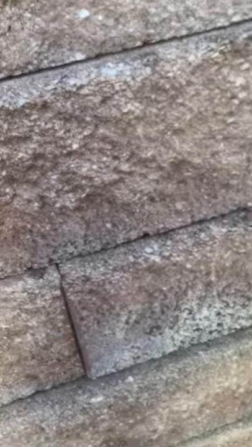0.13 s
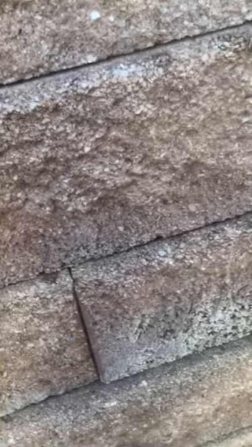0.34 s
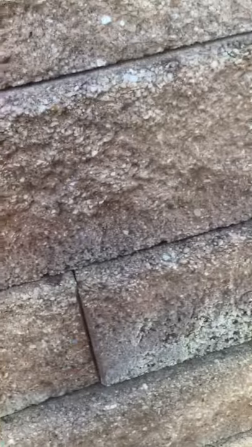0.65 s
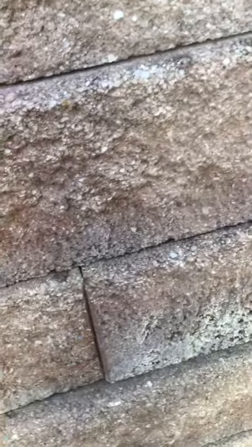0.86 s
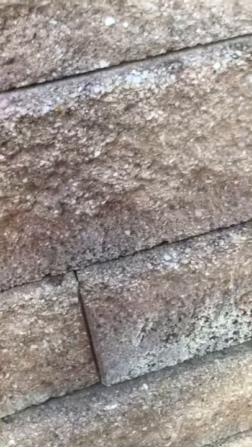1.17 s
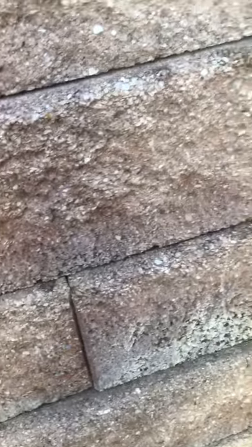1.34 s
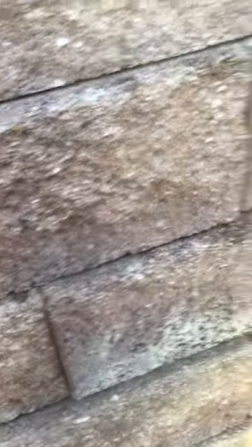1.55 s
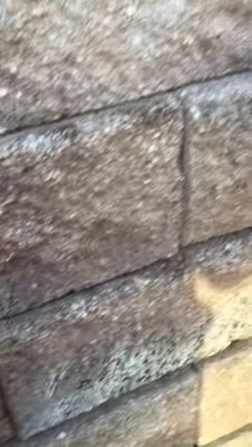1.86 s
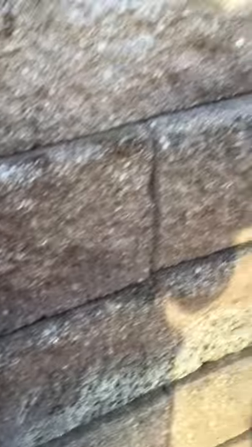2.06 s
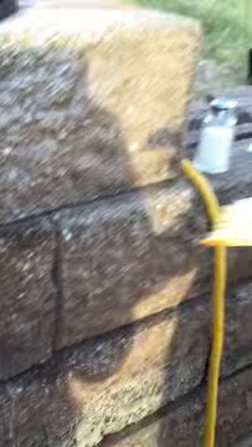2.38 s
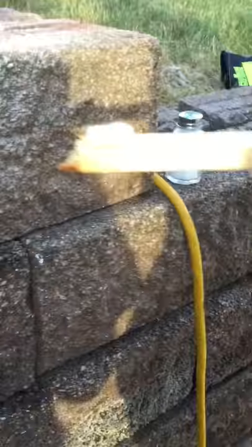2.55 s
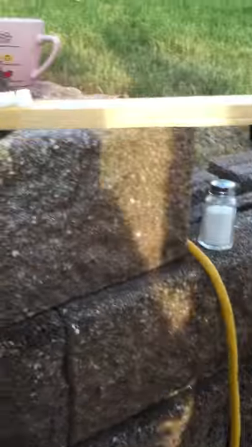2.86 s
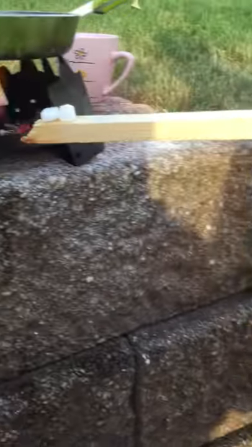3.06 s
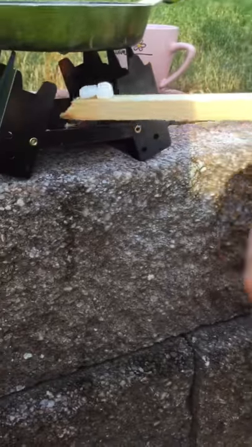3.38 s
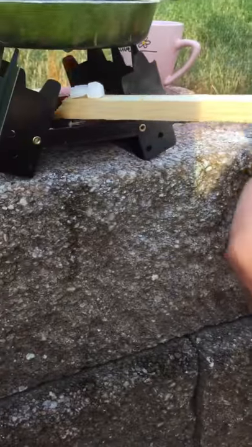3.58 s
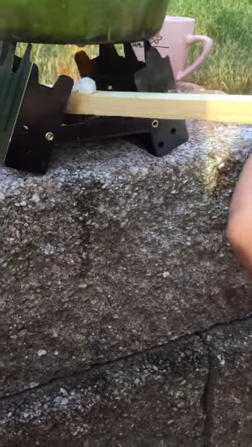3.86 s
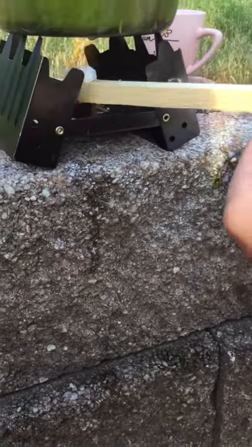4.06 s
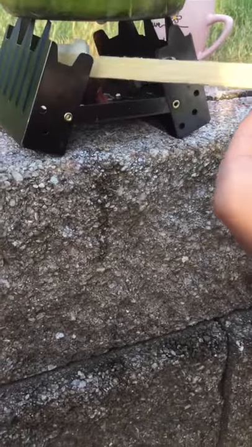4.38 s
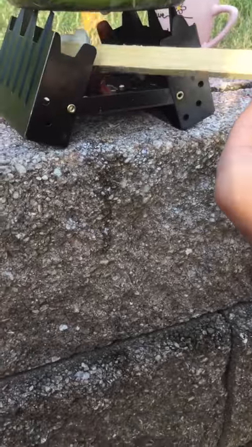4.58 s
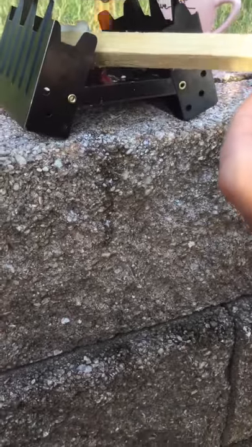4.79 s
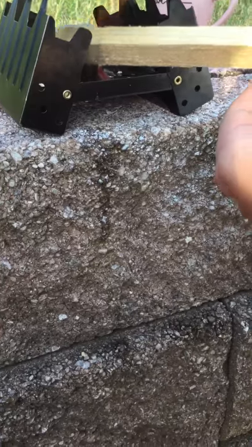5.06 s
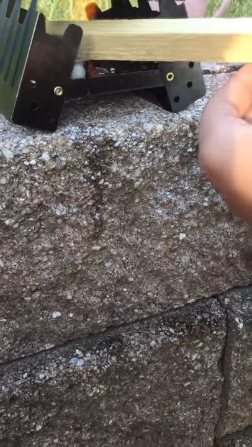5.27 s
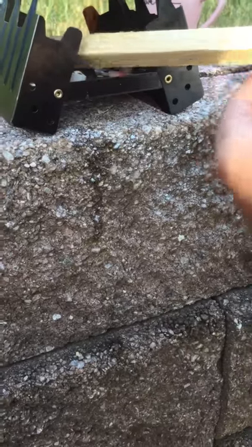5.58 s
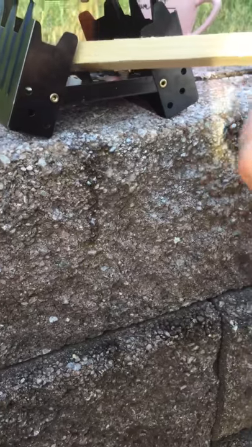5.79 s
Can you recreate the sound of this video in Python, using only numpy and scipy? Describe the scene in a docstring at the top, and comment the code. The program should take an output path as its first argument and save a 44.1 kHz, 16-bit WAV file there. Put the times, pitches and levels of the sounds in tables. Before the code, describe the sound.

In a quiet garden, a low distant rumble and a thin machine whine run under faint songbirds. Close to the microphone come a few tiny dry ticks, a soft sleeve swish and one sharp click. A wooden stick then scrapes lightly along a small folding steel stove while a bird chirps three times. Near the end a fuel tablet drops in and bounces to rest with a bright, tinny clatter, the loudest sound.

```python
"""A low distant rumble, a thin machine whine and songbirds fill a quiet garden. Close by, a wooden stick
pushes fuel tablets into a small folding steel stove: there are small dry ticks, a sleeve swishes, and the
stick scrapes along the edge by stick-slip friction. Then a tablet drops in and bounces to rest, each
impact exciting the damped, inharmonic modes of the sheet metal."""
import sys
import numpy as np
from scipy import signal
from scipy.fft import rfft, irfft
from scipy.io import wavfile

SR = 44100
rng = np.random.default_rng(int(sys.argv[2]) if len(sys.argv) > 2 else 0)


def wrap_up_sound(samples):
    """Save the sound to the file named by the first command line argument, as 16-bit audio."""
    columns = np.atleast_2d(samples).T
    # keep every value between -1 and 1, then stretch to whole-number steps
    tamed = np.clip(columns, -1, 1)
    steps = np.round(tamed * 32767).astype(np.int16)
    wavfile.write(sys.argv[1], SR, steps)


N = 261513
TIME = np.arange(N) / SR

# noise spectra of far traffic, the soft wash of the air and a sleeve: f/Hz, relative density/dB
RUMBLE_SPECTRUM = [(25, -60), (42, -54), (65, -28), (100, -10), (150, -3), (200, 0), (265, -3), (320, -10),
                   (450, -18), (640, -23), (850, -35), (2000, -80)]
WASH_SPECTRUM = [(100, -15), (520, -2), (640, 2), (850, -2), (1300, -2.5), (1480, -9), (1700, -20),
                 (2050, -31), (2600, -42), (8000, -70)]
SLEEVE_SPECTRUM = [(150, -25), (320, 0), (520, -2), (800, -14), (1600, -23), (2400, -29), (4000, -40),
                   (8000, -58)]
# slow course of the wash: t/s, level/dB
WASH_ENVELOPE = [(0.4, -67.5), (1.2, -68), (2.0, -69), (2.6, -67.5), (3.0, -68.5), (4.6, -69),
                 (5.78, -68.5)]
# far slurs, creaky calls and a warble: onset t/s, duration/s, f/Hz, glide/octaves, source level/dB
FAR_NOTES = [(0, 0.1, 2993, -0.04, -77.5), (.03, 0.14, 2470, -0.13, -82), (.43, 0.089, 3140, -0.71, -71),
             (0.485, 0.092, 2347, -0.15, -71), (2.201, 0.2, 2695, -0.069, -83),
             (3.715, 0.029, 3410, -0.014, -76), (4.42, .16, 2650, 0.47, -77),
             (4.665, 0.061, 2867, -0.22, -74), (4.725, 0.14, 2450, -0.086, -77),
             (5.02, 0.13, 2736, -0.27, -78)]
CREAK_NOTES = [(0.324, 0.11, 2746, -0.063, -76.5), (0.368, 0.098, 2815, 0.027, -76),
               (0.538, 0.094, 2775, -.02, -82)]
WARBLE_NOTES = [(1.43, 0.058, 2580, 0.056, -67), (1.475, 0.079, 2355, 0.31, -62.5),
                (1.525, 0.15, 2336, -0.29, -69), (1.52, 0.054, 3230, -0.087, -76),
                (1.965, 0.052, 2290, -0.13, -72), (1.995, 0.09, 2744, -0.027, -61.5),
                (2.064, 0.037, 2410, -0.54, -59.5), (2.145, 0.032, 1950, 0.18, -70.5),
                (2.175, 0.036, 2492, 0.045, -62), (2.585, 0.038, 2600, 0.22, -61),
                (2.62, 0.07, 2253, 0.44, -63.5), (2.755, 0.055, 2200, -0.038, -65),
                (3.368, 0.06, 3290, 0.11, -66), (4.125, 0.03, 3000, -0.21, -64.5),
                (4.285, 0.033, 2315, -0.14, -62), (4.565, 0.029, 3165, 0.37, -68),
                (4.8, 0.043, 3470, -0.23, -69)]
# partials of a creaky call: frequency ratio, relative level/dB
CREAK_PARTIALS = [(1, 0), (1.46, -7), (2, -6), (2.3, -17), (2.85, -15)]
# arm movements: middle t/s, duration/s, level/dB
ARM_MOVES = [(0.412, 0.39, -66), (2.572, 0.44, -60.5)]
# ticks of the stick, tablets and fingers: t/s, level/dB, centre f/Hz, T60/s
DRY_TICKS = [(0.563, -72.5, 10000, 0.097), (0.837, -61, 8720, 0.11), (1.761, -82, 6530, 0.11),
             (2.085, -76.5, 10900, 0.088), (2.391, -80, 4200, 0.079), (2.595, -58, 12440, 0.031),
             (2.6619, -35, 7650, 0.025), (2.712, -59, 11000, 0.018), (2.927, -62.5, 8480, 0.075),
             (3.411, -78, 5770, 0.087), (4.162, -50.5, 9200, 0.032), (5.229, -49.5, 9430, 0.011),
             (5.787, -63, 15400, 0.1), (5.827, -63.5, 14700, .06)]
# modes of a tick and the spectrum of its grit: ratio to centre frequency, relative level/dB
TICK_PARTIALS = [(.662, -5), (.75, -9), (.84, -4), (.907, -5), (.996, -3), (1.052, 0), (1.24, -9),
                 (1.35, -8)]
GRIT_SPECTRUM = [(.1, -30), (.5, -10), (.72, -3), (1, 0), (1.4, -3), (2, -12)]
# distinct modes of the stove: f/Hz, relative level/dB
STOVE_MODES = [(600, -16), (1214, -8), (1400, -9), (1588, 0), (1690, -7), (2023, -4), (2143, -1.5),
               (2260, -7), (2417, -4), (2700, -5), (2765, -3.5), (3130, -5), (3400, -1), (3528, -1),
               (3704, -4), (3930, -1.5), (4177, -2.5), (4448, -2.5), (4820, -2), (4944, 1.5), (5433, -.5),
               (6040, -8), (6440, -4), (6590, -5), (7319, -1), (8677, -3), (9071, -2), (10398, -8),
               (11395, -7), (12565, -10), (13817, -9)]
# its crowd of weaker, quickly damped modes: f/Hz, relative density/dB
CLATTER_SPECTRUM = [(100, -45), (600, -19), (1050, -17), (1350, -3), (1800, -7), (2300, -3), (4800, 0),
                    (6500, -5), (9500, -6), (15500, -11)]
# strokes of the stick along the steel: middle t/s, duration/s, level/dB, treble/dB
STICK_STROKES = [(2.58, 0.14, -76.5, -6), (2.648, .02, -59, 0), (2.733, 0.11, -59, 12),
                 (3.824, 0.024, -50.5, 12.5), (3.847, 0.055, -47.5, 1.5), (3.927, 0.037, -49, 4),
                 (3.975, 0.095, -62, 4), (4.017, 0.031, -58, 0), (4.122, .04, -67, 2),
                 (4.169, 0.039, -50, 2), (4.289, .04, -56, -3.5), (5.115, 0.052, -55.5, 6),
                 (5.222, 0.064, -59.5, -0.5), (5.497, 0.073, -52.5, -13), (5.691, 0.067, -64, -4.5),
                 (5.874, 0.049, -69, -6)]
# impacts on the stove: t/s, level/dB, bass/dB, presence/dB, treble/dB
IMPACTS = [(2.6605, -49, -5.5, -6, -3), (5.2399, -20, 4, 6, -2.5), (5.2747, -30, 4, -9, 1),
           (5.2791, -34, 3.5, -3, -8), (5.3096, -30.5, 2, -6, 0), (5.3536, -24.5, -4, -1.5, 1),
           (5.359, -24, -4.5, 0, 2.5), (5.427, -41, 8, 0, 7.5), (5.436, -37.5, 12, 1, 5.5),
           (5.446, -43.5, 13, -3, -4), (5.4837, -41, 8, -9.5, -10.5), (5.492, -49.5, 9, -6, -9),
           (5.5129, -45.5, 2, -2.5, -20), (5.52, -46.5, 0, 3.5, -14), (5.6755, -49.5, 0, -9.5, -4),
           (5.706, -54, 1.5, 5.5, -2), (5.852, -57, -18, 14.5, 15.5), (5.883, -62.5, -13, 16, 10)]


def from_db(db):
    """Decibels to amplitude ratio."""
    return 10 ** (np.asarray(db) / 20)


def rms_one(x):
    """Normalisation to unit rms."""
    return x / np.sqrt(np.mean(x ** 2) + 1e-20)


def add(track, s, sound):
    """Superposition of a sound on the track from time s on."""
    at = max(round(s * SR), 0)
    track[at:at + len(sound)] += sound[:N - at]


def butter(x, hz, kind, order):
    """Causal Butterworth low- or high-pass."""
    return signal.sosfilt(signal.butter(order, hz, kind, fs=SR, output="sos"), x)


def noise(spectrum, size):
    """Spectral shaping of white noise, at unit rms."""
    hz, db = np.transpose(spectrum)
    bins = np.maximum(np.fft.rfftfreq(size, 1 / SR), 1)
    gain = from_db(np.interp(np.log(bins), np.log(hz), db))
    return rms_one(irfft(rfft(rng.standard_normal(size)) * gain, size))


def drift(rate, size):
    """Random modulation of spread about 1, with `rate` new values a second."""
    return np.interp(TIME[:size] * rate, np.arange(4096), rng.standard_normal(4096))


def machine_whine(hz=1289, db=-74.5, shadow_db=-7.5, move_start_s=2.22, move_s=0.58):
    """Acoustic shadowing: a machine's wavering tone weakens as the listener moves round a wall."""
    level = from_db(db + shadow_db * np.clip((TIME - move_start_s) / move_s, 0, 1))
    tone = np.sqrt(2) * np.sin(2 * np.pi * np.cumsum(hz * (1 + .0015 * drift(11, N))) / SR)
    return level * tone * from_db(2.4 * drift(16, N))


def ambient_noise(rumble_db=-52.5, hiss_db=-94):
    """Incoherent noises add in power: far traffic, a soft wash and the microphone's own hiss."""
    rumble = from_db(rumble_db) * noise(RUMBLE_SPECTRUM, N)
    wash = from_db(np.interp(TIME, *np.transpose(WASH_ENVELOPE))) * noise(WASH_SPECTRUM, N)
    return rumble + wash + from_db(hiss_db) * rng.standard_normal(N)


def whistles(notes, waver, arch_octaves=0.027):
    """Frequency and amplitude modulation: each note is a fluttering tone on an arched glide."""
    out = np.zeros(N)
    for s, length, pitch_hz, glide, db in notes:
        u = np.linspace(0, 1, round(length * SR))
        octaves = glide * (u - .5) - arch_octaves * (2 * u - 1) ** 2
        hz = pitch_hz * 2 ** octaves * (1 + waver * drift(500, len(u)))
        swell = np.abs(np.sin(np.pi * u)) ** .8 * from_db(db + 2.5 * drift(180, len(u)))
        add(out, s, np.sqrt(2) * swell * np.sin(2 * np.pi * np.cumsum(hz) / SR))
    return out


def chirps(start_s=4.135, period_s=0.1125, count=3, length_s=.039, hz=3877, glide_octaves=-0.384):
    """Periodic repetition: a near bird's falling chirp, with a weaker voice above the main one."""
    voices = [(hz, -55), (hz * 1.26, -78)]   # f/Hz, level/dB
    notes = [(start_s + k * period_s, length_s, voice_hz, glide_octaves, db)
             for k in range(count) for voice_hz, db in voices]
    return whistles(notes, waver=.02)


def trees(x, t60, size=22050):
    """Scattering by trunks and leaves turns a sound into a short diffuse tail."""
    tail = rng.standard_normal(size) * from_db(-60 * TIME[:size] / t60)
    return signal.fftconvolve(x, tail / np.linalg.norm(tail))[:N]


def birds():
    """Direct-to-diffuse ratio: the near chirps are mostly direct, the other calls more scattered."""
    near = chirps()
    warble = whistles(WARBLE_NOTES, waver=.022)
    far = whistles(FAR_NOTES, waver=.035)
    partials = [(s, length, hz * ratio, glide, db + partial_db)
                for s, length, hz, glide, db in CREAK_NOTES for ratio, partial_db in CREAK_PARTIALS]
    creak = whistles(partials, waver=.016)
    direct = near + from_db(-2) * warble + from_db(-3) * far
    echo = trees(from_db(-12) * near + from_db(-4) * warble, t60=0.22)
    return direct + echo + trees(far, t60=.27) + trees(creak, t60=.18)


def sleeve_swishes(flutter_db=2.0):
    """Friction noise: a sleeve brushes along unevenly while the arm moves."""
    swell = sum(from_db(db) * np.exp(-(2 * (TIME - s) / length) ** 2) for s, length, db in ARM_MOVES)
    return swell * from_db(flutter_db * drift(25, N)) * noise(SLEEVE_SPECTRUM, N)


def contact_colour(x, bass_db=0, treble_db=0, presence_db=0, spot_spread_db=3.0):
    """Contact filtering: softness cuts treble, the rim cuts bass, each spot favours its own bands."""
    bass_hz, presence_hz, treble_hz = 2200, 5400, 7000
    hz = np.maximum(np.fft.rfftfreq(len(x), 1 / SR), 1)
    spot_db = np.interp(hz, np.linspace(0, SR / 2, 64), spot_spread_db * rng.standard_normal(64))
    hump_db = presence_db * np.exp(-(2 * np.log2(hz / presence_hz)) ** 2)
    shelves_db = bass_db / (1 + (hz / bass_hz) ** 6) + treble_db / (1 + (treble_hz / hz) ** 6)
    cepstrum = irfft(np.log(from_db(spot_db + hump_db + shelves_db)), len(x))
    cepstrum[1:len(x) // 2] *= 2   # minimum phase: nothing sounds before the contact
    cepstrum[len(x) // 2 + 1:] = 0
    return irfft(rfft(x) * np.exp(rfft(cepstrum)), len(x))


def dry_ticks(fade_share=0.22, fade_above_t60=.03, grit_db=-8, size=8192):
    """Exponential decay: dry ticks with a brief high ring and grit; longer ones are given a fade-in."""
    out, t = np.zeros(N), TIME[:size]
    ratio, mode_db = np.transpose(TICK_PARTIALS)[:, :, None]
    for s, db, hz, t60 in DRY_TICKS:
        fade_s = max(fade_share * (t60 - fade_above_t60), 0) + 1 / SR
        modes = from_db(mode_db) * np.sin(2 * np.pi * (hz * ratio * t + rng.random(ratio.shape)))
        grit = from_db(grit_db) * noise(np.array(GRIT_SPECTRUM) * [hz, 1], size)
        body = rms_one(rms_one(modes.sum(axis=0)) + grit)
        envelope = from_db(db - 60 * np.maximum(t - fade_s, 0) / t60) * np.minimum(t / fade_s, 1)
        add(out, s - fade_s / 2, contact_colour(body * envelope, spot_spread_db=2))
    return out


def stove_ring(clatter_db, clatter_t60=.11, spread_db=2.5,
               twin_db=-2, twin_detune=0.03, twin_t60=0.098, size=16384):
    """Modal superposition: the stove's impulse response, with new mode strengths at every touch."""
    t = TIME[:size]
    hz, db = np.transpose(STOVE_MODES)[:, :, None]
    t60 = .155 * (hz / 1000) ** -.12   # higher modes die sooner
    strength = from_db(db + spread_db * rng.standard_normal(hz.shape)) * rng.choice([-1, 1], hz.shape)
    modes = np.sin(2 * np.pi * hz * t) * from_db(-60 * t / t60)
    # the other, nearly alike panel answers slightly off pitch and dies sooner
    twin_hz = hz * (1 + twin_detune * rng.standard_normal(hz.shape))
    twins = np.sin(2 * np.pi * twin_hz * t) * from_db(twin_db - 60 * t / twin_t60)
    twins *= rng.choice([-1, 1], hz.shape)
    ring = butter(np.sum(strength * (modes + twins), axis=0), 750, "high", order=3)
    return ring + noise(CLATTER_SPECTRUM, size) * from_db(clatter_db - 60 * t / clatter_t60)


def stick_scrapes(slips_per_s=800, slip_spread_db=5.0, damping_t60=0.48, bass_db=-2.5, size=22050):
    """Stick-slip friction: wood crosses the edge in tiny catches and damps the metal that it excites."""
    out, t = np.zeros(N), TIME[:size]
    for s, length, db, treble_db in STICK_STROKES:
        pressure = np.exp(-4 * np.abs(t - length) / length)
        slipping = rng.random(size) < slips_per_s / SR
        slips = slipping * from_db(slip_spread_db * rng.standard_normal(size)) * rng.choice([-1, 1], size)
        ring = stove_ring(clatter_db=11.5, size=4096)
        ring *= from_db(-60 * t[:len(ring)] / damping_t60)
        rub = signal.fftconvolve(slips * pressure, ring)[:size]
        rub = contact_colour(rub, bass_db, treble_db)
        stroke_rms = np.sqrt(np.sum(rub ** 2) / (length * SR / 2) + 1e-20)
        add(out, s - length, from_db(db) * rub / stroke_rms)
    return out


def tablet_knocks(crack_db=11.0, shortest_contact_s=0.004, doubling_db=26, attack_samples=350):
    """Impact excitation: a tablet hits the steel with a gritty crack, then the modes ring freely."""
    out = np.zeros(N)
    hardest_db = max(row[1] for row in IMPACTS)
    for s, db, bass_db, presence_db, treble_db in IMPACTS:
        # weaker knocks drag on the steel for longer
        contact_s = shortest_contact_s * 2 ** ((hardest_db - db) / doubling_db)
        ring = stove_ring(clatter_db=6.0)
        crack = noise(CLATTER_SPECTRUM, len(ring)) * np.exp(-TIME[:len(ring)] / (2 * contact_s))
        crack = from_db(crack_db) * butter(crack, 1100, "high", order=4)
        hit = contact_colour(ring + crack, bass_db, treble_db, presence_db)
        add(out, s, from_db(db) * hit / np.std(hit[:attack_samples]))
    return butter(out, 450, "high", order=4)   # small panels radiate no bass


def scene():
    """Linear superposition of the stove close by and the garden around it, in one channel."""
    close_by = tablet_knocks() + dry_ticks() + stick_scrapes() + sleeve_swishes()
    return (close_by + birds() + machine_whine() + ambient_noise())[None]


def record(dry):
    """Band limiting: an elliptic low-pass cuts the top steeply."""
    cutoff_hz = 15750
    return signal.sosfilt(signal.ellip(12, .1, 90, cutoff_hz, fs=SR, output="sos"), dry)


dry = scene()
out = record(dry)
wrap_up_sound(out)
```